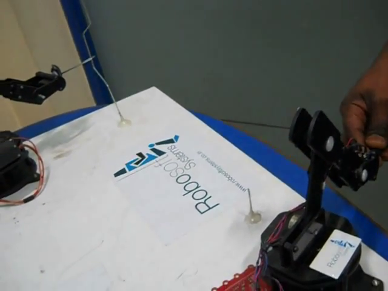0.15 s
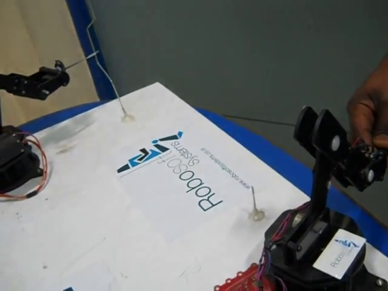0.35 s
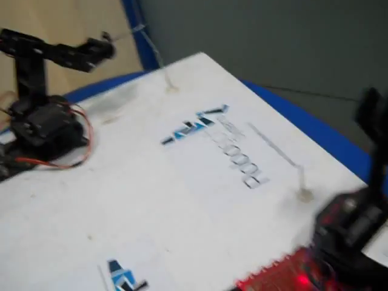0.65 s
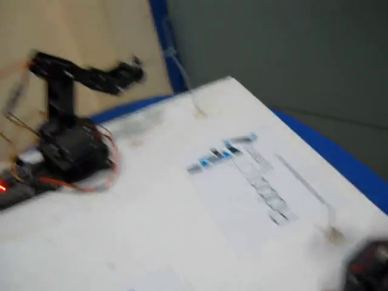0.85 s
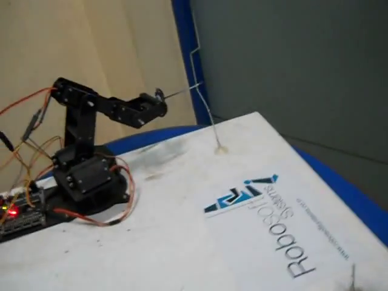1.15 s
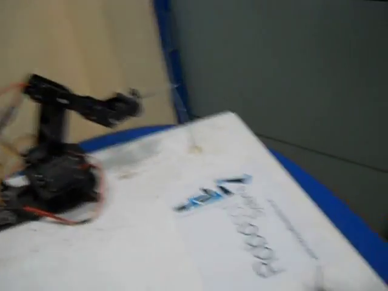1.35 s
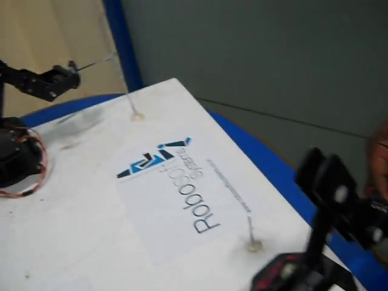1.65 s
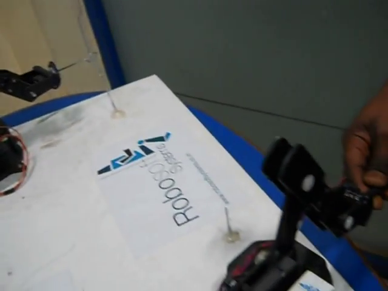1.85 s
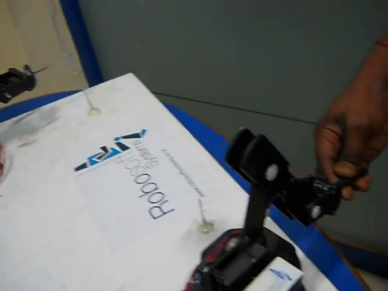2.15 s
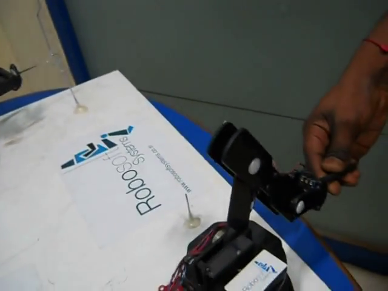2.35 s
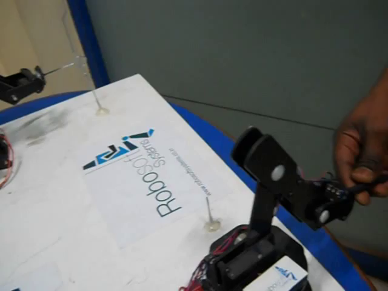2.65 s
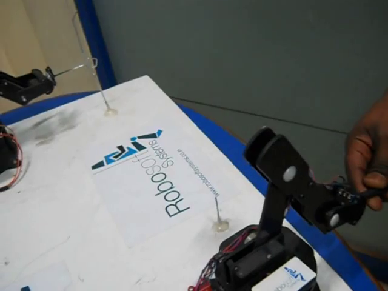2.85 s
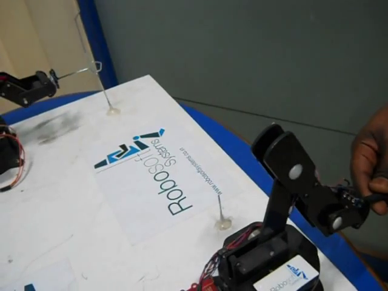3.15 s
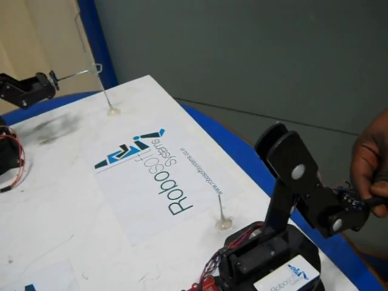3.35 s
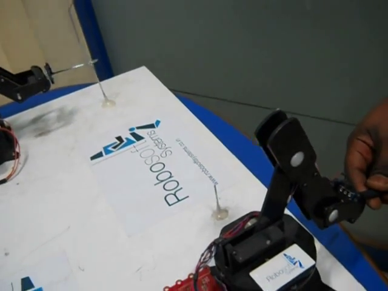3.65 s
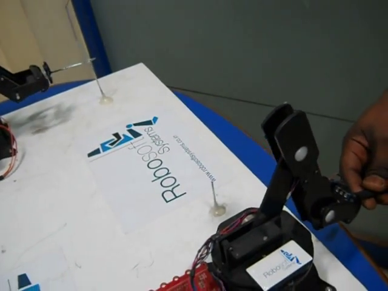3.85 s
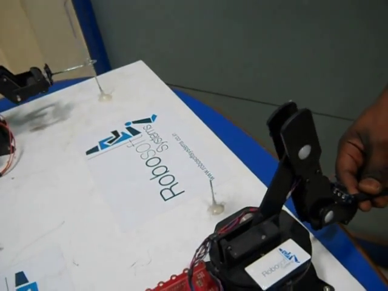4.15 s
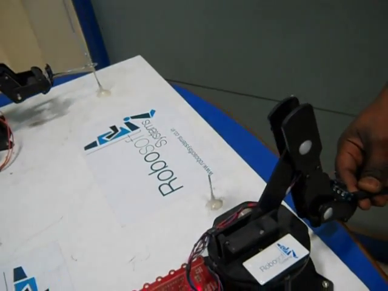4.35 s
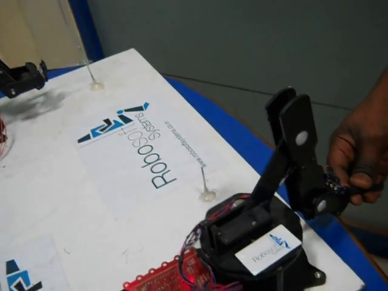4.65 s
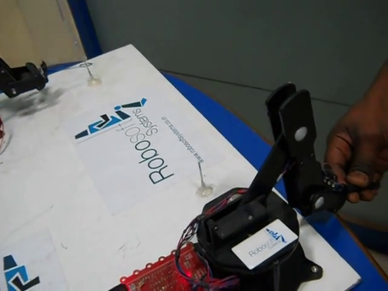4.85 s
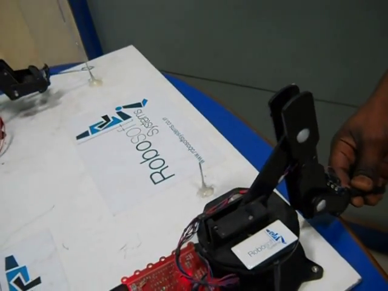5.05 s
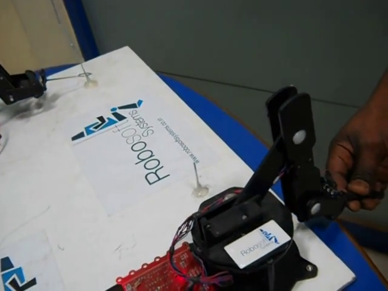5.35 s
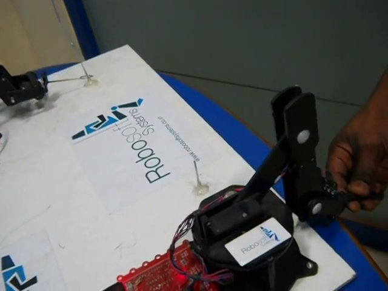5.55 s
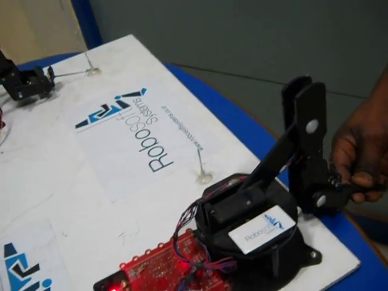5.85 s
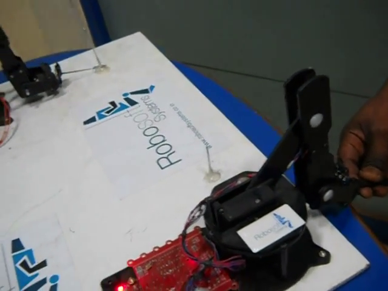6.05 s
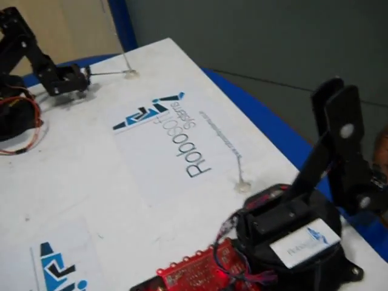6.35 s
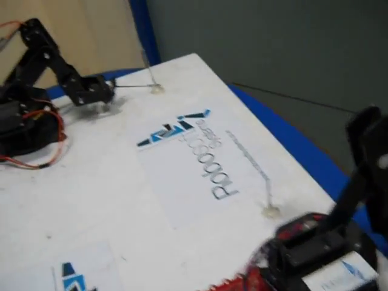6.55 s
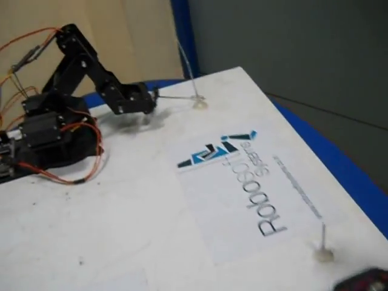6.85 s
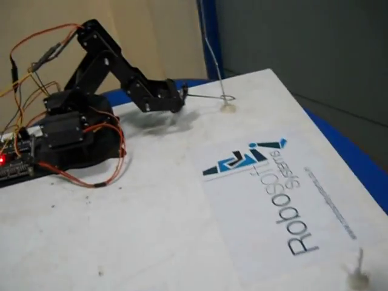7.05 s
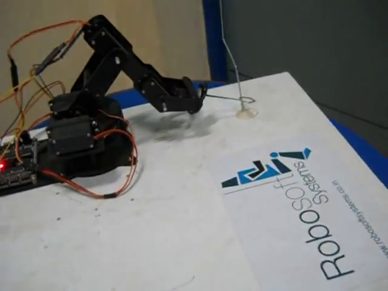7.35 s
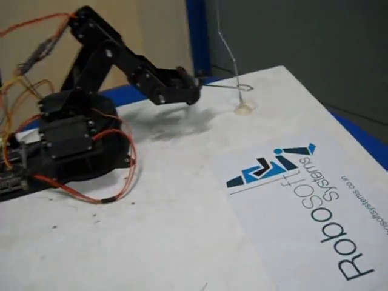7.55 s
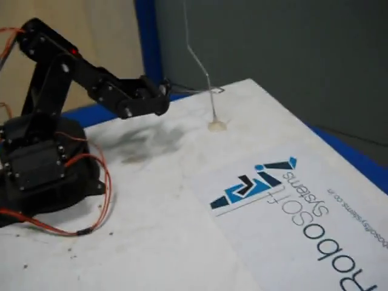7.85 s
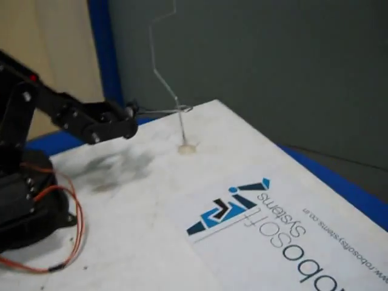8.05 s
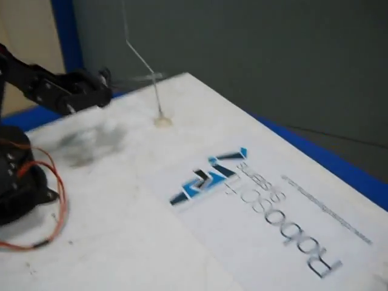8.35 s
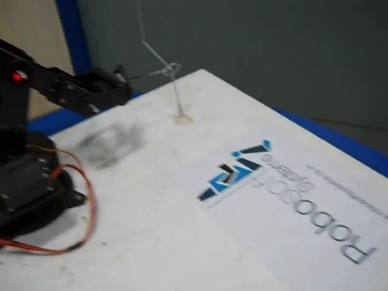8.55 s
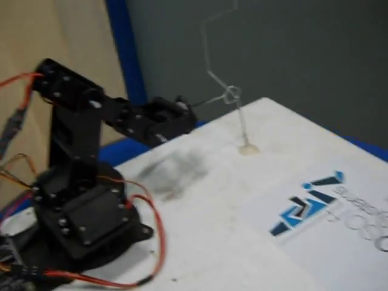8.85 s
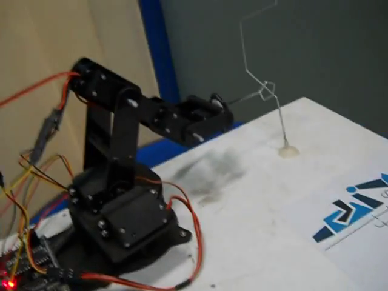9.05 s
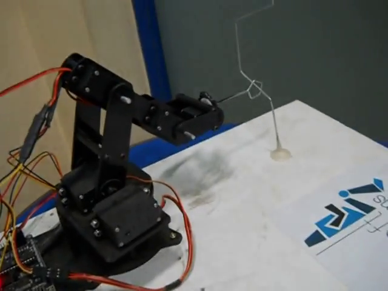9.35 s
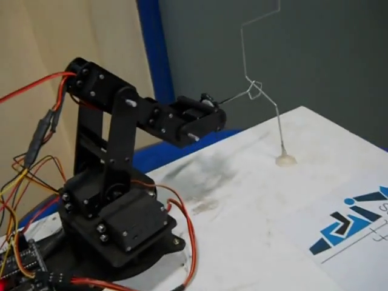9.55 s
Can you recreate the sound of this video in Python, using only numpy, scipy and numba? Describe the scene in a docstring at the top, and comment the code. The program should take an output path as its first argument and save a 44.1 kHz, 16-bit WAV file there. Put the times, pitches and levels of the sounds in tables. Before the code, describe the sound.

Small robot arm hums and whines on a tabletop amid low room rumble, with scattered ticks, handling bumps and a hard crack late on.

```python
"""A droning room, where a small robot arm on a tabletop is heard by a hand-held camera.
Broadband air noise and wavering sines make the room; a slow sway shakes the camera.
Servos hum, and gear noise pulsed fifty times a second passes through resonances.
Noise bursts and snaps ring damped modes of arm, table and a small part; a hand bumps the camera.
One sharp knock makes the camera's gain control duck and creep back."""
import sys
import numpy as np
from scipy import signal
from scipy.fft import rfft, irfft
from scipy.io import wavfile
from scipy.ndimage import uniform_filter1d
from numba import njit

SR = 44100
rng = np.random.default_rng(int(sys.argv[2]) if len(sys.argv) > 2 else 0)


def dump_mix(stems):
    """Bounce the given channels to the path in sys.argv[1] as a 16-bit WAV at rate SR."""
    frames = np.atleast_2d(stems).T  # one column per channel
    limited = np.clip(frames, -1, 1)  # hard clip at full scale
    pcm = np.round(limited * 32767).astype(np.int16)
    wavfile.write(sys.argv[1], SR, pcm)


N = 427769  # length [samples]


def undb(db):
    """Decibel law: a level in dB becomes an amplitude ratio."""
    return 10 ** (np.asarray(db) / 20)


def level(x, db):
    """RMS normalisation: scale a signal to a mean power given in dB."""
    return x * undb(db) / np.sqrt(np.mean(x ** 2))


def curve(table):
    """Linear interpolation: points (time [s], value) joined by lines, one value a sample."""
    return np.interp(np.arange(N) / SR, *np.transpose(table))


def band(x, hz, width):
    """Resonance: a two-pole filter with gain 1 at its centre."""
    return signal.lfilter(*signal.iirpeak(hz, hz / width, SR), x)


def walk(rate):
    """Smoothed random modulation: levels held 1 / rate s and slewed twice; spread near 1."""
    hold = int(SR / rate)
    steps = np.repeat(rng.standard_normal(N // hold + 1), hold)
    slewed = uniform_filter1d(uniform_filter1d(steps, hold), hold)
    return 1.332 * slewed[:N]


def tone(hz, waver_hz, flicker_db, rough_db=0.):
    """Frequency and amplitude modulation: a sine, rms 1 before its level flickers and flutters."""
    phase = 2 * np.pi * np.cumsum(hz + waver_hz * walk(6)) / SR
    start = 2 * np.pi * rng.random()
    return np.sqrt(2) * np.sin(phase + start) * undb(flicker_db * walk(9) + rough_db * walk(30))


def swells(rows, rest_db, edge_s):
    """Amplitude envelope: a resting gain, to which each row adds a rise, hold and fall."""
    t = np.arange(N) / SR

    def hump(start, length):
        # half height at start and end; a short one stays below full height
        return np.clip(np.minimum(t - start, start + length - t) / edge_s + .5, 0, 1)

    return undb(rest_db) + sum(undb(db) * hump(start, length) for start, length, db in rows)


def ring(push, modes, gains, order=1):
    """Modal superposition: a push excites damped resonances, summed and scaled to peak 1."""
    total = 0
    for k, (hz, t60) in enumerate(modes):
        # order 1 alternates the signs so that the valleys fill; 0 starts all together
        sign = (-1) ** (k * order)
        width = np.log(1000) / np.pi / t60
        total = total + sign * gains[k] * band(push, hz, width)
    return total / abs(total).max()


# Spectrum of the room's air: (frequency [Hz], relative density [dB per Hz])
AIR_SPECTRUM = [(20, -3.5), (45, -7), (70, -13.5), (110, -17.5), (170, -15.5), (280, -21), (420, -18),
                (650, -18.5), (800, -22), (880, -23), (1050, -25), (1400, -32.5), (2400, -34.5),
                (3400, -36), (4000, -41), (4600, -45)]
AIR_DB = -22.5  # rms


def air():
    """Shaped broadband noise: overlapping octave bands of room noise flicker independently."""
    hz = np.arange(N // 2 + 1) * SR / N + 1  # 1 Hz up, to keep the logarithm finite
    f, db = np.transpose(AIR_SPECTRUM)
    noise = rfft(rng.standard_normal(N)) * undb(np.interp(np.log(hz), np.log(f), db))
    out = 0
    for octave in range(4, 13):
        share = np.clip(1 - abs(np.log2(hz) - octave), 0, 1)
        out = out + irfft(noise * share, N) * undb(0.8 * walk(2.99))
    return level(out, AIR_DB)


# Steady drones: (frequency [Hz], width [Hz], rms level before flicker [dB])
STEADY_DRONES = [(31.7, 5.7, -31), (81.2, 3, -36.5), (113.7, 4, -35.5), (136.85, 3, -34.5),
                 (141.6, 2.983, -33.5), (210.6, 4, -39.5), (248.2, 2, -40), (297.2, 2, -43.5),
                 (468.8, 4, -42.5), (597, 3, -42), (634, 4, -43.5), (729, 4, -43), (1690, 5, -54),
                 (1795, 8, -54.5)]
# Servo hum, swelling while the camera faces the arm: (time [s], level [dB])
SERVO_HUM_LEVEL = [(0, -36.5), (1.6, -33.5), (2.1, -30), (5.4, -28), (7.3, -28), (7.9, -34.5)]
SERVO_HUM_HZ, HUM_SAG_HZ_PER_S = 328.5, .4
# Mains overtone, coming and going: (time [s], level [dB])
OVERTONE_LEVEL = [(0, -34), (1.4, -34), (2., -39.5), (2.3, -34), (3., -35), (3.6, -37.5), (4.2, -29),
                  (4.7, -36), (5.45, -35), (6.1, -39), (6.9, -36), (7.6, -38), (9.7, -36.5)]
OVERTONE_HZ = 499.6
# Whine, moving in pitch and level: (time [s], frequency [Hz], level [dB])
WHINE_PATH = [(0, 839.5, -36), (1, 837.4, -36), (2, 835, -38), (3, 833.5, -38), (4.3, 830, -38.5),
              (5.2, 829, -46), (6.599, 825, -46), (7.2, 823, -39), (7.698, 822, -43), (9, 830, -43.5),
              (9.7, 830, -40.5)]


def drones():
    """Line spectrum of rotating and mains machines: fans, transformers, servo hum and whine."""
    t = np.arange(N) / SR
    steady = sum(undb(db) * tone(hz, width / 2, flicker_db=min(0.62 * width, 3.))
                 for hz, width, db in STEADY_DRONES)
    servo = tone(SERVO_HUM_HZ - HUM_SAG_HZ_PER_S * t, 0.61, flicker_db=2.0)
    overtone = tone(OVERTONE_HZ, 0.9, flicker_db=2.5, rough_db=2.0)
    time, whine_hz, whine_db = np.transpose(WHINE_PATH)
    whine = tone(np.interp(t, time, whine_hz), 1.1, flicker_db=2.0, rough_db=3.5)
    return (steady + undb(curve(SERVO_HUM_LEVEL)) * servo
            + undb(curve(OVERTONE_LEVEL)) * overtone
            + undb(np.interp(t, time, whine_db)) * whine)


# Waves of the low sway: (start [s], length [s], level added to the rest [dB])
SWAY_WAVES = [(.15, 0.074, -20.5), (.66, 0.63, -24.5), (1.6, 0.36, -23), (2.15, 0.31, -27),
              (2.62, 0.97, -22.5), (3.98, 0.49, -23), (4.97, 0.88, -30.5), (6., 0.21, -16.5),
              (6.75, 0.27, -21.5), (7.42, 0.5, -25.5)]
SWAY_REST_DB, SWAY_EDGE_S, SWAY_HZ = -26.5, 0.13, 22.26


def rumble():
    """Low-frequency vibration: hand tremor and the building shake the camera in unsteady waves."""
    sway = tone(SWAY_HZ, 2.6, flicker_db=3.0)
    return swells(SWAY_WAVES, SWAY_REST_DB, SWAY_EDGE_S) * sway


# Gear resonances: (frequency [Hz], width of each of two passes [Hz], relative level [dB])
GEAR_MODES = [(3270, 510, -1.5), (3690, 750, 7), (3960, 300, 0.5)]
# Servos straining to move a joint: (start [s], length [s], gear chatter added to idle [dB])
SERVO_STRAINS = [(.12, 0.054, -56), (3.77, 0.22, -38), (4.2, 0.087, -39.5), (4.74, 0.084, -39),
                 (5.55, 0.44, -38), (6.15, 0.4, -43), (7.35, 0.59, -41.5)]
# Squeaks of one joint: (start [s], length [s], frequency [Hz], level before flutter [dB])
JOINT_SQUEAKS = [(0.117, 0.053, 2690, -40), (0.242, 0.055, 2640, -42), (0.43, .06, 2520, -38.5),
                 (.53, .06, 2720, -43), (.62, .06, 2580, -39), (.7, .13, 2660, -39),
                 (0.866, 0.097, 2570, -38), (3.8, 0.14, 2750, -45), (7.701, 0.23, 2670, -42)]
CHATTER_HZ, GEARS_IDLE_DB, STRAIN_EDGE_S = 50.3, -43, 0.078
SQUEAK_HZ, SQUEAK_WIDTH_HZ, SQUEAK_IDLE_DB, SQUEAK_EDGE_S = 2670, 320, -56, .025


def chatter():
    """Pulsed excitation of resonances: each control frame kicks the motor, one joint squeaks lower."""
    cycles = np.arange(N) * CHATTER_HZ / SR
    frame_size = undb(2.0 * rng.standard_normal(int(cycles[-1]) + 1))
    size = frame_size[cycles.astype(int)]
    puffs = (0.69 + np.exp(-(cycles % 1) / 0.39)) * size * rng.standard_normal(N)
    gears = sum(undb(db) * band(band(puffs, hz, w), hz, w) for hz, w, db in GEAR_MODES)

    def squeak(hz):
        once = band(puffs, hz, SQUEAK_WIDTH_HZ)
        return level(band(once, hz, SQUEAK_WIDTH_HZ), 0)

    squeaks = undb(SQUEAK_IDLE_DB) * squeak(SQUEAK_HZ)
    for start, length, hz, db in JOINT_SQUEAKS:
        squeaks = squeaks + swells([(start, length, db)], -np.inf, SQUEAK_EDGE_S) * squeak(hz)
    # the servos hunt, so both flutter about their levels
    gear_gain = swells(SERVO_STRAINS, GEARS_IDLE_DB, STRAIN_EDGE_S) * undb(0.8 * walk(11))
    return gear_gain * level(gears, 0) + undb(1.6 * walk(22)) * squeaks


# Motor under load: (start [s], length [s], level added to the rest [dB])
MOTOR_LOADS = [(5.55, 0.36, -44), (6.1, .33, -43)]
# Motor notes: (frequency [Hz], width [Hz], relative level [dB])
MOTOR_NOTES = [(3750, 180, 1.5), (4330, 130, 3.5)]


def whirr():
    """Narrow-band noise: two resonances make a breathy motor note, swelling under load."""
    noise = rng.standard_normal(N)
    note = sum(undb(db) * band(noise, hz, w) for hz, w, db in MOTOR_NOTES)
    return swells(MOTOR_LOADS, -68.5, STRAIN_EDGE_S) * level(note, 0)


# Ticks and scrapes; those at 2.395, 6.043 and 7.476 s are faint chance bursts of the background noise:
# (time [s], peak of the arm-mode ring [dB], burst [ms], brightest frequency [Hz],
# peak of the table-mode thud relative to that ring [dB])
TICK_BURSTS = [(0.241, -23.5, 5.5, 2620, -17), (0.812, -29, 3.4, 2580, 11), (0.9536, -14, 4.2, 1950, 8),
               (.959, -19.5, 16, 2120, -1), (0.977, -12, 5.5, 2350, 2), (.9825, -10.5, 8.8, 2430, -17),
               (.992, -12, 25, 2350, -5), (1.02, -22, 44, 2500, -7), (1.054, -17, 8.5, 2500, -9),
               (1.062, -13, 15.5, 2350, -4), (1.144, -26, 31, 3250, -24), (1.202, -24.5, 11, 2480, 6),
               (1.47, -21.5, 2.5, 2300, -27), (2.157, -24, 3.5, 1970, -10), (2.263, -24, 9.1, 2520, -8),
               (2.395, -30.5, 3.5, 2380, 2), (3.136, -24, 28, 2100, -14), (3.18, -25, 29, 2150, -15),
               (5.445, -27, 9.1, 3500, -17), (5.943, -30, 12, 3540, -20), (6.043, -24.5, 5, 3320, -2),
               (7.120, -24.5, 4, 2600, -8), (7.222, -24, 8, 3400, -25), (7.24, -27.5, 6, 2800, -16),
               (7.476, -34, 4, 2380, 11), (8.095, -18, 7.4, 2500, 7), (8.106, -29.5, 20, 2600, 4),
               (8.139, -13, 1.6, 2900, 11), (8.142, -17, 5.9, 2700, 2), (8.155, -30.5, 22, 2500, 7),
               (8.181, -25, 15, 2500, 0), (8.165, -18.5, 4.6, 3600, -11), (8.1732, -6, 0.9, 2630, -5),
               (8.198, -14, 4.3, 3200, 1), (8.2125, -17, 21, 2780, 8), (8.2412, 11.5, 0.54, 2400, 5),
               (8.2418, 6.5, 2.5, 2100, -16.5), (8.255, -11, 5, 3300, 1), (8.27, 4.5, 1.6, 3000, -18),
               (8.2738, 7.5, 2.74, 3210, -2), (8.28, -29, 21, 3200, 4), (8.311, -27, 3, 2500, -19),
               (8.413, -18, 22, 3280, -24), (8.468, -23.5, 18, 2500, -18.5), (8.593, -20.5, 12, 2700, -20),
               (8.7112, -22.5, 10, 2600, -23), (9.148, -34, 5, 2400, -1), (9.26, -26, 8.5, 3500, -18),
               (9.52, -26, 7.3, 3480, -12)]
# Arm modes before each burst alters them: (frequency [Hz], ring time t60 [s], weight [dB])
ARM_MODES = [(1250, 0.013, -2), (1430, 0.0049, -6.5), (1758, 0.015, 3.5), (1895, 0.022, 1),
             (2153, 0.01, -2), (2420, 0.02, 1), (2750, 0.0085, -1.5), (2974, 0.015, 0), (3210, 0.014, -2),
             (3760, 0.02, 0), (4100, 0.022, 3)]
# Table modes: (frequency [Hz], ring time t60 [s], weight [dB])
TABLE_MODES = [(457, 0.0075, -4), (610, 0.016, 2), (748, 0.013, 3), (890, 0.013, 2.5), (1055, 0.0098, -4.5)]
MODE_SCATTER_DB, MODE_DETUNE = 1.5, .012  # spread of mode weight, and of frequency as a fraction
SHARP_BURST_MS = 3.5  # scale below which a burst wakes all modes
RUB_DAMP_MS = 12  # a burst this long halves the ring time
BURST_TOP = 1.44  # a burst excites little above this multiple of its brightest frequency
CRACK_DB, CRACK_WIDTH_HZ = -2, 1840


def ticks():
    """Modal response to noise bursts: each rings arm modes near its own pitch, and table modes."""
    length = 8192
    out, t = np.zeros(N + length), np.arange(length) / SR
    chance = rng.standard_normal((len(TICK_BURSTS), 3, length))
    table_modes = [(f, t60) for f, t60, g in TABLE_MODES]
    table_gains = [t60 * undb(g) for f, t60, g in TABLE_MODES]
    for (start, db, ms, hz, thud_db), (noise, grit, place) in zip(TICK_BURSTS, chance):
        u = t * 1000 / ms
        # uneven grains, as in catch and slip
        push = noise * undb(2.86 * grit) * np.exp(-u ** 2) * np.minimum(.3 + u / .15, 1)
        push[0] += 6.9 * np.exp(-ms / RUB_DAMP_MS)  # initial impulse, soft in a long burst
        push = signal.lfilter(*signal.butter(4, BURST_TOP * hz, fs=SR), push)

        modes, gains = [], []
        for (f, t60, g), scatter, pose in zip(ARM_MODES, place, place[::-1]):
            # a sharp burst wakes all modes, a long one those near it
            nearness = np.exp(-(np.log(f / hz) / 0.26) ** 2)
            reach = nearness + 0.18 + 0.35 * np.exp(-ms / SHARP_BURST_MS)
            # narrow modes take less of a burst, so the long ringers are weighted up
            gains.append(reach * t60 ** 0.69 * undb(g + MODE_SCATTER_DB * scatter))
            # the arm's pose shifts its modes a little; a lasting burst damps them
            modes.append((f * (1 + MODE_DETUNE * pose), t60 / (1 + ms / RUB_DAMP_MS)))
        y = ring(push, modes, gains)
        y += undb(thud_db) * ring(push, table_modes, table_gains, order=0)
        # the dry sound of the burst itself
        crack = band(band(push, hz, CRACK_WIDTH_HZ), hz, CRACK_WIDTH_HZ)
        y += undb(CRACK_DB) * crack / abs(crack).max()
        # a faint short tail from the tabletop and walls
        y += 0.35 * band(band(grit, hz, 2500.), hz, 2500.) * np.exp(-t / 0.02)
        i = int(start * SR)
        out[i:i + length] += undb(db) * y
    return out[:N]


# Bumps of the hand on the camera: (time of the centre [s], peak [dB], push [ms])
HAND_BUMPS = [(2.239, -15, 3.7), (3.539, -19, 6.9), (4.674, -11, 2.2), (5.039, -7, 7.2), (7.455, -7, 1.4),
              (7.475, -9, 3), (7.49, -16, 7.5)]


def bumps():
    """Pressure pulse: each bump sucks the diaphragm back, with weaker opposite lobes on both sides."""
    out, t = 0, np.arange(N) / SR
    for centre, db, ms in HAND_BUMPS:
        u = (t - centre) * 1000 / ms
        out = out - undb(db) * (1 - u ** 2) * np.exp(-u ** 2 / 2)
    return out


# Singing joint: (start [s], length [ms], frequency [Hz], level of the main tone [dB],
# upper partial relative to it [dB])
JOINT_CHIRPS = [(2.986, 16, 2530, -26, -9.5)]
CHIRP_PARTIAL = 1.33  # frequency ratio


def chirps():
    """Inharmonic partials: a joint sings briefly, flat-topped, with a weaker tone above."""
    out, t = 0, np.arange(N) / SR
    for start, ms, hz, db, upper_db in JOINT_CHIRPS:
        u = (t - start) * 1000 / ms
        upper = np.sin(2 * np.pi * CHIRP_PARTIAL * hz * t)
        sing = np.sin(2 * np.pi * hz * t) + undb(upper_db) * upper
        out = out + undb(db) * np.exp(-(2 * u - 1) ** 4) * sing
    return out


# Clean clicks of a small stiff part: (time [s], peak of the ring [dB], share of the side modes [ratio])
PART_CLICKS = [(3.059, -21, .3), (3.124, -8.5, 0.87), (3.17, -10, 0.85)]
# Modes of the part: (frequency [Hz], ring time t60 [s], weight [dB])
PART_MODES = [(1520, 0.042, -10.5), (1870, .015, -12), (2300, 0.0077, -11), (2520, 0.012, -0.5),
              (2750, 0.016, -1.5), (3370, 0.018, -7.5), (3860, 0.011, -4), (4330, 0.0072, -13)]
SNAP_DB = -7.5  # unpitched crack at a full side share, relative to the ring


def clicks():
    """Impulse response of a stiff body: a snap rings the part, its side modes by a given share."""
    length = 4096
    out, t = np.zeros(N), np.arange(length) / SR
    modes = [(hz, t60) for hz, t60, g in PART_MODES]
    for (start, db, side), noise in zip(PART_CLICKS, rng.standard_normal((len(PART_CLICKS), length))):
        push = noise * np.exp(-t / .0028)
        push[0] += 4.  # the snap itself
        # narrow modes take less of a snap, so each is weighted by its ring time
        gains = [t60 * undb(g) * (1 if 2400 < hz < 2900 else side) for hz, t60, g in PART_MODES]
        crack = band(band(push, 2800., 2400.), 2800., 2400.)
        y = ring(push, modes, gains) + undb(SNAP_DB) * side * crack / abs(crack).max()
        i = int(start * SR)
        out[i:i + length] += undb(db) * y
    return out


# the hardest knock sets a thin wire ringing
WIRE_S, WIRE_HZ, WIRE_DB, WIRE_T60_S = 8.243, 1610, -12, 0.13


def wire():
    """Exponential decay of a single mode: a thin wire dies away."""
    t = np.arange(N) / SR - WIRE_S
    fade = undb(WIRE_DB - 60 * abs(t) / WIRE_T60_S)
    return (t > 0) * fade * np.sin(2 * np.pi * WIRE_HZ * t)


def scene():
    """Linear superposition: all sources add at the camera."""
    room = air() + drones() + rumble()
    motors = chatter() + whirr()
    events = ticks() + bumps() + chirps() + clicks() + wire()
    return (room + motors + events)[None]


@njit
def ducking(x, top, attack, hold, release):
    """Automatic gain control: gain drops fast on a loud peak, waits, then eases back."""
    gain, envelope, wait = np.empty(len(x)), top, 0.
    for i in range(len(x)):
        if abs(x[i]) > envelope:
            envelope, wait = envelope + attack * (abs(x[i]) - envelope), hold
        elif wait > 0:
            wait -= 1
        else:
            envelope += release * (top - envelope)
        gain[i] = top / envelope
    return gain


# band-reject at 4 kHz, as left by resampling from 8 kHz: a wide dip, then a narrow notch
RESAMPLING_DIP_HZ, RESAMPLING_DIP_WIDTH_HZ, RESAMPLING_DIP_DEPTH = 4006, 870, 0.59
RESAMPLING_NOTCH_WIDTH_HZ, RESAMPLING_NOTCH_DEPTH = 140, 0.77
ROLL_HZ, TOP_HZ = 3560, 4683  # gentle fall of the treble, and the steep upper limit
GAIN_TOP, GAIN_ATTACK_S, GAIN_HOLD_S, GAIN_RELEASE_S = 0.73, 0.00057, 0.73, 0.38
HUM_HZ, HUM_IN_DB, HUM_DB = 99.7, -31, -49  # mains hum, ahead of and behind the gain control


def record(dry):
    """Signal chain: 4 kHz band-reject, falling top, gain control, circuit hum, overload, narrow band."""
    dipped = dry - RESAMPLING_DIP_DEPTH * band(dry, RESAMPLING_DIP_HZ, RESAMPLING_DIP_WIDTH_HZ)
    notch = band(dipped, RESAMPLING_DIP_HZ, RESAMPLING_NOTCH_WIDTH_HZ)
    notched = dipped - RESAMPLING_NOTCH_DEPTH * notch
    rolled = signal.sosfilt(signal.butter(4, ROLL_HZ, fs=SR, output="sos"), notched)
    attack, release = 1 / (GAIN_ATTACK_S * SR), 1 / (GAIN_RELEASE_S * SR)
    gain = ducking(rolled[0], GAIN_TOP, attack, GAIN_HOLD_S * SR, release)
    hum = tone(HUM_HZ, 0.6, flicker_db=1.0)
    controlled = (rolled + undb(HUM_IN_DB) * hum) * gain
    wet = np.clip(controlled + undb(HUM_DB) * hum, -1, 1)
    return signal.sosfilt(signal.cheby1(10, .5, TOP_HZ, fs=SR, output="sos"), wet)


dry = scene()
out = record(dry)
dump_mix(out)
```